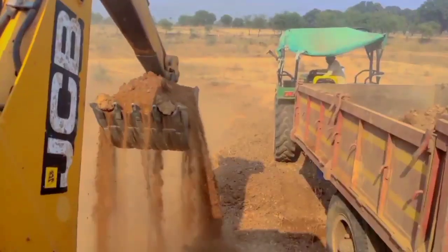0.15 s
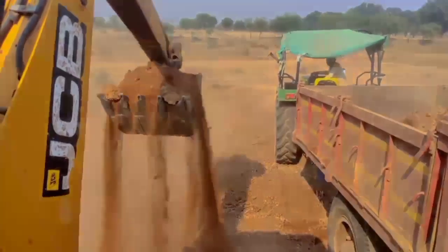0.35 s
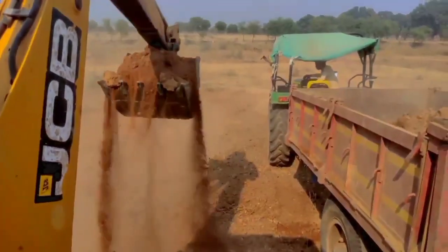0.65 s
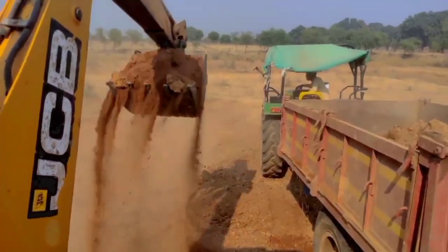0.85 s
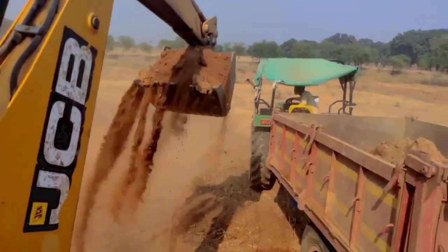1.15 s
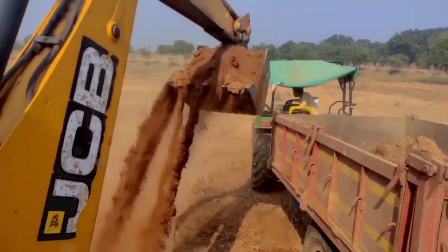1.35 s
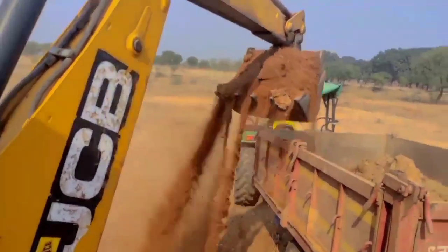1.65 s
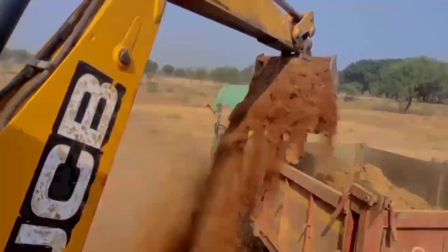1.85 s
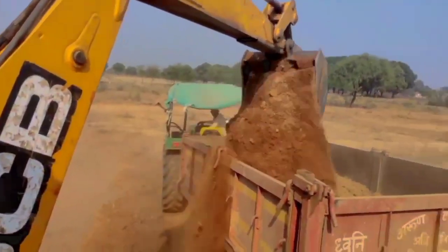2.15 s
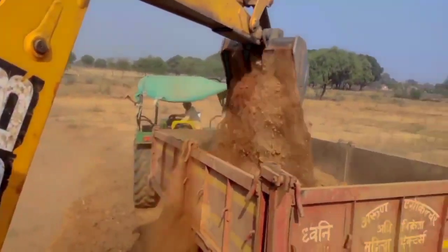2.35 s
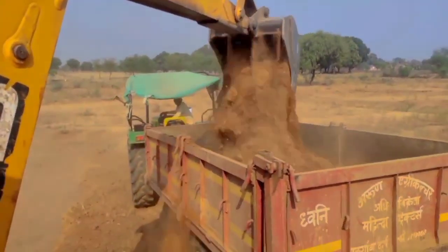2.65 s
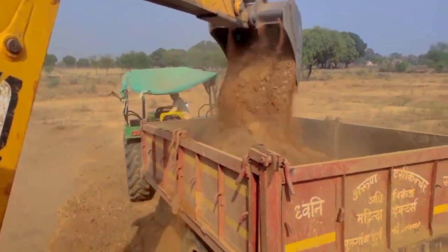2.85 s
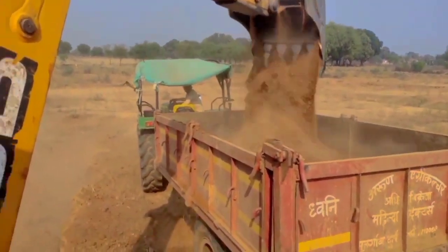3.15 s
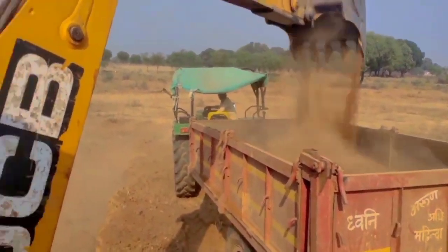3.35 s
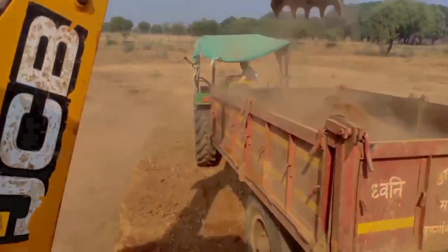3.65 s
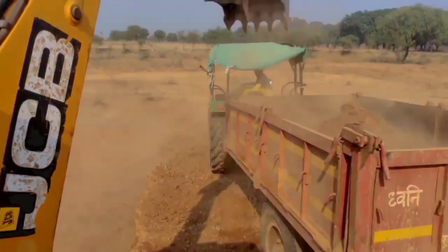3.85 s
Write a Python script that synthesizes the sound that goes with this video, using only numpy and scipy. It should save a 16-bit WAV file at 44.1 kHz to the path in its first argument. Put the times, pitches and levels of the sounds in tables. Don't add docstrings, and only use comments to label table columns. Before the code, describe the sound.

After 0.2 s of near silence, a close digger diesel opens with a wavering thrum and pulsing clatter. Clods and stones hit around 0.6, 1.4 and 1.6 s. From 1.9 s pins groan and grit crackles brightly; soil rushes from 2.2 s, strongest near 2.8, with knocks and squeals. Heavy thuds at 3.3-3.5 s end the pour. Outdoors, phone suppression chops the hum; the engine sags, then remains.

```python
import sys
import numpy as np
from scipy import signal
from scipy.fft import rfft, irfft
from scipy.io import wavfile

SR = 44100
rng = np.random.default_rng(int(sys.argv[2]) if len(sys.argv) > 2 else 0)


def voltage_ratio(decibels):
    exponent = np.asarray(decibels, float) / 20
    return 10 ** exponent


def wrap_up_sound(samples):
    columns = np.atleast_2d(samples).T
    tamed = np.clip(columns, -1, 1)
    steps = np.round(tamed * 32767).astype(np.int16)
    wavfile.write(sys.argv[1], SR, steps)


N = 176400


def engine():
    # start_s, third_order_hz
    speed = [
        (.2, 149.5),
        (.9, 150),
        (1.47, 146.5),
        (1.86, 151),
        (3.57, 151),
        (3.74, 141),
    ]
    third_hz, = in_time(speed)
    turns = np.cumsum(third_hz) / (3 * SR)
    return exhaust(turns) + block_clatter(turns)


def exhaust(turns):
    # multiple of firing rate, level_db
    orders = [(1, -16), (2, -3), (3, 1.5), (4, -5.5), (5, -18)]
    # start_s, level_db
    hum_gate = [(.2, -37), (.4, -33.5), (1.0, -32.5), (1.85, -32.5), (2.1, -53.5), (2.2, -71),
                (2.27, -29.5), (2.55, -33), (2.9, -30.5), (3.13, -31), (3.22, -53), (3.32, -30),
                (3.37, -45), (3.44, -29), (3.57, -42.5), (3.7, -51), (3.76, -31), (3.88, -24.5)]
    # pitch_hz, level_db (per Hz)
    rumble_spectrum = [(41, -26), (70, -22.5), (161, -2.5), (208, -1), (347, -18), (554, -20), (800, -31.5),
                       (1040, -65), (1760, -120)]
    wobble_db, wobble_hz, rumble_db = 4, 20.4, -5.5
    hum_db, = in_time(hum_gate)
    hum = np.zeros(N)
    for k, db in orders:
        wobble = wobble_db * min(k / 3, 1) ** 2 * drift(wobble_hz)
        phase = k * turns + (k > 3) / 2
        hum += voltage_ratio(db + wobble) * np.sin(2 * np.pi * phase)
    rumble = patchy_noise(rumble_spectrum, patchy_db=2.5, rate_hz=16)
    rumble_gain = voltage_ratio(rumble_db - 33.5 + 0.35 * (hum_db + 33))
    return voltage_ratio(hum_db) * rms_one(hum) + rumble_gain * rumble


def block_clatter(turns):
    # start_s, level_db
    load = [
        (.2, 0),
        (1.0, 0.5),
        (2.1, 4.5),
        (3.0, 4),
        (3.5, 4),
        (3.75, 1.5),
    ]
    # pitch_hz, level_db (per Hz)
    block_spectrum = [(410, -53), (700, -30), (795, -39.5), (967, -6.5), (1080, -11.5), (1150, -3),
                      (1740, 2.5), (2060, -5.5), (3000, -24), (3900, -68), (6600, -120)]
    # pitch_hz, level_db (per Hz)
    hiss_spectrum = [(2900, 1), (3450, 6), (4600, -7.5), (6200, -13.5), (8000, -3.5), (9500, -3.5),
                     (11600, -8.5), (15500, -18.5)]
    depth, jitter_db, decay_s = .2, 3.0, .006
    load_db, = in_time(load)
    fired = np.diff(np.floor(turns), prepend=0) * voltage_ratio(jitter_db * rng.standard_normal(N))
    r = np.exp(-1 / (decay_s * SR))
    beat = rms_one(1 + depth * signal.lfilter([2], [1, -r], fired))
    block = voltage_ratio(-32) * patchy_noise(block_spectrum, patchy_db=3.0, rate_hz=8.1, count=7)
    hiss = voltage_ratio(-42) * patchy_noise(hiss_spectrum, patchy_db=3.0, rate_hz=3.8, count=9)
    return cut(voltage_ratio(load_db) * beat * (block + hiss), (2400, 3272), "stop", order=2)


def soil():
    # start_s, level_db
    pour = [
        (2.0, -53),
        (2.2, -26),
        (2.42, -35.5),
        (2.58, -38),
        (2.78, -23.5),
        (3.06, -27),
        (3.12, -27),
        (3.23, -33),
        (3.3, -23),
        (3.6, -81),
    ]
    # pitch_hz, level_db (per Hz)
    soil_spectrum = [(350, -16), (600, -13), (648, -18.5), (865, 2.5), (1670, 3.5), (3200, -12),
                     (4200, -24.5), (6000, -48), (7800, -72), (13200, -120)]
    pour_db, = in_time(pour)
    return voltage_ratio(pour_db + 2.4 * drift(31)) * patchy_noise(soil_spectrum, patchy_db=2.5, rate_hz=36, count=7)


def clods():
    # start_s, peak_db, t60_s, brightness_db
    impacts = [(0.5719, -6.5, 0.35, -11), (1.3942, -1.5, 0.27, -13), (2.1435, -13, 0.085, 10.5),
               (2.16, -18, 0.06, 6.5), (2.169, -21.5, 0.41, 7), (1.925, -13.5, 0.25, -18),
               (2.3016, -4, 0.32, -60), (2.4858, -1.5, 0.42, -40), (2.711, -8.5, 0.38, -31),
               (2.7821, -16, 0.39, -50), (2.9452, -13.5, 0.33, -8.5), (3.255, 3.5, 0.095, -26.5),
               (3.2935, -24, 0.23, 5.5), (3.362, -8.5, 0.16, -9), (3.369, -7.5, 0.16, -21),
               (3.455, -2, 0.098, -7), (3.499, -2.5, 0.09, -8), (3.5214, -35.5, 0.5, 11.5)]
    # pitch_hz, level_db (per Hz)
    steel_spectrum = [(410, -53), (700, -42), (971, 5.5), (1840, 8.5), (2920, -16), (4300, -8),
                      (6400, -18.5), (8600, -11.5), (11500, -21), (16000, -33)]
    clod_db, spray_db, attack_s, grain_db, split_hz = -15.5, 9, .0012, .8, 2700
    s, db, t60, bright_db = np.transpose(impacts)
    steel = patchy_noise(steel_spectrum, patchy_db=1.2, rate_hz=22.4) * voltage_ratio(grain_db * drift(100))
    dull = rms_one(cut(steel, split_hz, "low"))
    spray = rms_one(cut(steel, split_hz, "high"))
    return (dull * bursts(s, db + clod_db, t60, attack_s)
            + spray * bursts(s, db + bright_db + clod_db + spray_db, t60, attack_s))


def knocks():
    # start_s, peak_db, pitch_hz, t60_s
    stones = [(0.66, -2, 1660, 0.046), (0.668, -7, 1697, 0.06), (.676, -9.5, 984, 0.05),
              (1.595, -4, 2170, 0.031), (1.597, -19, 3520, 0.089), (1.6, -15.5, 2270, .09),
              (1.936, -21, 2695, 0.076), (1.601, -10, 1895, 0.11), (1.931, -7.5, 1696, 0.1),
              (1.94, -3, 1690, 0.055), (3.272, -5, 1890, 0.028), (3.501, -5.5, 1866, 0.067),
              (3.634, 1.9, 1743, 0.03), (3.642, -12, 1740, 0.035), (3.649, -10, 1618, 0.064),
              (.264, -14, 1660, 0.056), (.985, -27.5, 4570, 0.14), (2.011, -18, 4400, 0.023),
              (2.464, -16, 1540, .06), (2.557, -14, 1310, .06), (2.62, -15, 1456, .06),
              (2.68, -9.5, 1400, 0.079), (2.694, -14, 1490, 0.053), (2.728, -7, 1754, 0.059),
              (2.782, -8, 1845, 0.043), (2.819, -8.5, 1420, 0.095), (2.865, -12.5, 1990, 0.067),
              (2.904, -12, 1620, .06), (2.946, -7.5, 1470, 0.066), (3.05, -8, 1864, 0.052),
              (3.688, -14.5, 1805, 0.067)]
    # multiple of pitch, level_db
    modes = [(0.621, -19.5), (0.832, -12), (0.998, -6), (1.169, -18.5)]
    out, t = np.zeros(N), np.arange(SR // 5) / SR
    attack = 1 - np.exp(-t / .0012)
    chance = rng.standard_normal((len(stones), len(modes)))
    for (s, db, hz, t60), luck in zip(stones, chance):
        ring = np.zeros(len(t))
        for (k, mode_db), z in zip(modes, luck):
            ring += voltage_ratio(mode_db + 2 * z) * np.sin(2 * np.pi * hz * k * (1 + 0.032 * z) * t)
        i = int(s * SR)
        out[i:i + len(t)] += ring * voltage_ratio(db - 60 * t / t60) * attack
    return out * voltage_ratio(1.6 * drift(260))


def grit():
    # start_s, peak_db
    snaps = [(0.4973, -23), (0.5192, -21), (0.779, -15), (0.9852, -23), (1.1633, -17.5), (1.1804, -16),
             (1.2014, -24), (1.2554, -25), (1.5397, -16), (1.553, -21), (1.5806, -16.5), (1.6008, -14.5),
             (1.6666, -21), (1.711, -17), (1.8322, -17), (1.951, -15), (1.986, -11), (1.9977, -10),
             (2.0137, -7), (2.0166, -13), (2.0555, -16), (2.0747, -12), (2.0864, -16), (2.1017, -7.5),
             (2.2214, -18), (2.2336, -10), (2.3196, -24), (2.3461, -12), (2.4124, -19), (2.5311, -13.5),
             (2.6569, -13), (2.6784, -12), (2.71, -12.5), (2.7192, -11.5), (2.7561, -21), (2.7791, -18),
             (2.8454, -24), (3.024, -23), (3.4426, -17)]
    snap_db, t60_s = -7.5, 0.011
    ticks_per_s, tick_db, peak_s, spread_s, ends_s = 420, -46.5, 2.21, 0.35, 3.2
    s, db = np.transpose(snaps)
    t = np.arange(N) / SR
    swell = 0.39 + np.exp(-.5 * ((t - peak_s) / spread_s) ** 2)
    cloud = swell / (1 + np.exp((t - ends_s) / 0.072))
    tick_gain = voltage_ratio(tick_db + 2.96 * np.minimum(rng.exponential(1, N), 4))
    ticks = (rng.random(N) < ticks_per_s * cloud / SR) * tick_gain
    dust = signal.lfilter([1], [1, -voltage_ratio(-60 / (t60_s * SR))], ticks)
    gate = dust + bursts(s, db + snap_db, s * 0 + t60_s, .0001)
    wash_noise = cut(rng.standard_normal(N), (9100, 15600), "band", order=2)
    wash = voltage_ratio(-40.5 + 0.52 * drift(25)) * cloud * wash_noise
    return cut(gate * rng.standard_normal(N), (8070, 14100), "band", order=2) * 1.89 + wash


def groans():
    # start_s, length_s, start_hz, end_hz, level_db
    pins = [(1.872, 0.074, 234.2, 272, -19), (1.95, 0.044, 262, 273, -27.5), (2.01, 0.059, 415, 467, -25),
            (2.079, 0.074, 467, 465, -16.5), (2.17, 0.068, 462, 438, -34.5),
            (2.262, 0.054, 193, 186.5, -22.5), (2.55, 0.13, 154.4, 221, -22), (2.68, 0.14, 208.6, 208, -26),
            (2.97, 0.074, 722, 729, -19.5), (3.158, 0.08, 896, 854, -18), (2.152, 0.062, 1045, 1047, -22.5)]
    # start_s, length_s, start_hz, end_hz, level_db
    squeals = [(3.09, 0.082, 1950, 1895, -17), (3.175, .05, 1860, 2300, -33),
               (3.09, 0.083, 1060, 1100, -21), (2.5, 0.026, 2150, 2130, -23), (3.1, 0.058, 2850, 2820, -33),
               (3.178, 0.041, 2620, 2660, -30), (3.03, 0.028, 1870, 1850, -23.5),
               (.98, .035, 2000, 2000, -26.5), (2.315, 0.013, 4450, 4450, -34.5),
               (.68, 0.049, 950, 780, -31.5), (1.05, 0.059, 980, 1100, -40)]
    # start_s, length_s, pitch_hz, level_db
    panels = [(0.355, 0.087, 950, -37), (0.666, 0.066, 387, -31.5), (0.922, 0.069, 987, -35),
              (1.2, 0.095, 892, -43), (2.49, 0.055, 456.6, -31), (1.633, 0.11, 995, -36.5),
              (1.809, 0.071, 990, -34), (2.23, 0.055, 591, -32.5), (2.281, 0.082, 953, -28.5),
              (2.498, 0.082, 874, -32.5), (2.568, 0.016, 4440, -29.5), (2.74, 0.15, 861, -28.5),
              (2.844, 0.077, 662, -30), (3.264, 0.016, 572, -30), (3.355, 0.15, 822, -29.5)]
    steady = [(s, length, hz, hz, db) for s, length, hz, db in panels]
    return (tones(pins, rough_db=2.5, waver_hz=5.1)
            + tones(squeals + steady, rough_db=3.5, waver_hz=19.7))


def tones(rows, rough_db, waver_hz):
    rise, overtone_db, halo_db = 0.12, -13.5, -18.0
    out, wander = np.zeros(N), waver_hz * drift(60)
    for s, length, start_hz, end_hz, db in rows:
        i, n = int(s * SR), int(1.3 * length * SR)
        u = np.arange(n) / n
        hz = start_hz + (end_hz - start_hz) * u + wander[i:i + n] * (1 + start_hz / 4000)
        phase = 2 * np.pi * np.cumsum(hz) / SR
        shape = np.minimum(u / rise, 1) * np.sin(np.pi / 2 * np.minimum(2 - 2 * u, 1))
        tone = np.sin(phase)
        if start_hz < 1000 and not 230 < start_hz < 300:
            tone = tone + voltage_ratio(overtone_db) * (np.sin(2 * phase) + np.sin(3 * phase) / 5)
        out[i:i + n] += voltage_ratio(db) * shape * tone
    return out * voltage_ratio(rough_db * drift(52)) * (1 + voltage_ratio(halo_db + rough_db) * drift(119))


def puffs():
    # start_s, peak_db, t60_s
    breaths = [
        (1.775, -33.5, .3),
        (1.793, -28, 0.11),
        (1.85, -35, 0.26),
        (2.012, -22, 0.12),
        (2.49, -33, 0.18),
        (3.522, -31.5, .2),
        (3.37, -29, 0.12),
    ]
    air = rms_one(cut(rng.standard_normal(N), (7750, 12900), "band", order=2))
    return air * bursts(*np.transpose(breaths), 0.0017)


def port(x):
    # pitch_hz, width_hz, level_db
    dips = [(2760, 200, -2), (5010, 170, -2.5), (6640, 610, -5), (10550, 200, -5), (13700, 400, -4)]
    hz = np.arange(N // 2 + 1) * SR / N
    dip_db = sum(db * np.exp(-.5 * ((hz - at_hz) / width) ** 2) for at_hz, width, db in dips)
    return irfft(rfft(x) * voltage_ratio(dip_db), N)


def rms_one(x):
    return x / np.sqrt(np.mean(x ** 2) + 1e-20)


def in_time(rows):
    s, *columns = np.transpose(rows)
    return [np.interp(np.arange(N) / SR, s, c) for c in columns]


def cut(x, hz, kind, order=4):
    return signal.sosfilt(signal.butter(order, hz, kind, fs=SR, output="sos"), x)


def drift(rate_hz):
    r = np.exp(-40 * np.pi * rate_hz / SR)
    slow = signal.lfilter([1], [1, -2 * r, r * r], rng.standard_normal(N // 20 + 2002))[2000:]
    return np.interp(np.arange(N) / 20, np.arange(len(slow)), rms_one(slow - slow.mean()))


def patchy_noise(spectrum, patchy_db, rate_hz, count=3):
    octave = np.log2(np.maximum(np.arange(N // 2 + 1) * SR / N, 1))
    hz, db = np.transpose(spectrum)
    shaped = rfft(rng.standard_normal(N)) * voltage_ratio(np.interp(octave, np.log2(hz), db, -90, -90))
    shared = drift(rate_hz)
    out = np.zeros(N)
    for centre in np.arange(np.log2(hz[0]) - .3, np.log2(hz[-1]) + .4, 1 / count):
        band = irfft(shaped * np.clip(1 - count * abs(octave - centre), 0, 1), N)
        out += band * voltage_ratio(patchy_db * (0.47 * shared + drift(rate_hz)))
    return rms_one(out)


def bursts(s, db, t60, attack_s):
    out = np.zeros(N + SR)
    t = np.arange(SR // 2) / SR
    attack = 1 - np.exp(-t / attack_s)
    for start, level_db, ring in zip(s, db, t60):
        i = int(start * SR)
        out[i:i + len(t)] += voltage_ratio(level_db - 60 * t / max(ring, .003)) * attack
    return out[:N]


def scene():
    return port(engine() + soil() + clods() + knocks() + grit() + groans() + puffs())[None]


def band_limit(x):
    return signal.sosfilt(signal.butter(12, 16450, fs=SR, output="sos"), x)


def record(dry):
    start_s, near_silence = 0.2002, voltage_ratio(-45.5)
    t = np.arange(N) / SR
    times = [start_s - .1, start_s - .05, start_s, start_s + 0.018]
    gain = np.interp(t, times, [0, near_silence, near_silence, 1])
    return band_limit(cut(dry * gain, 15650, "low", order=40))


dry = scene()
out = record(dry)
wrap_up_sound(out)
```